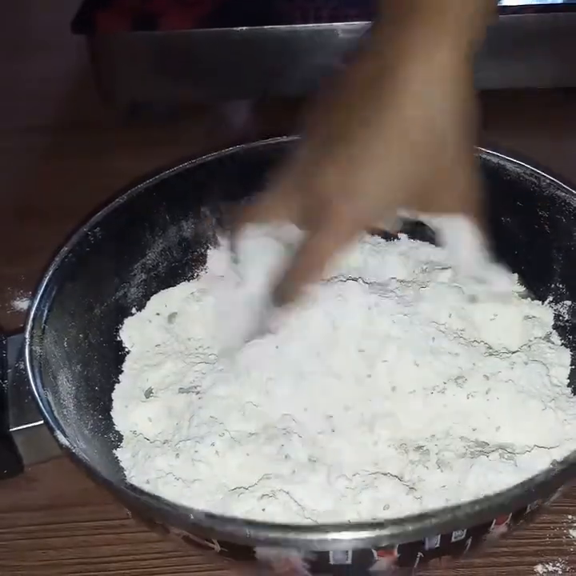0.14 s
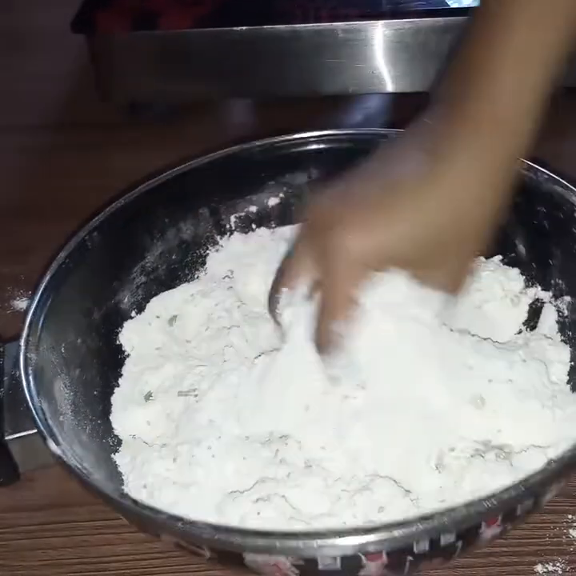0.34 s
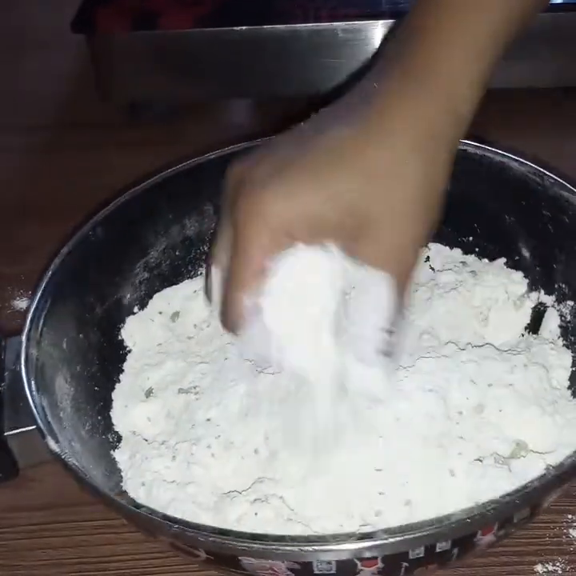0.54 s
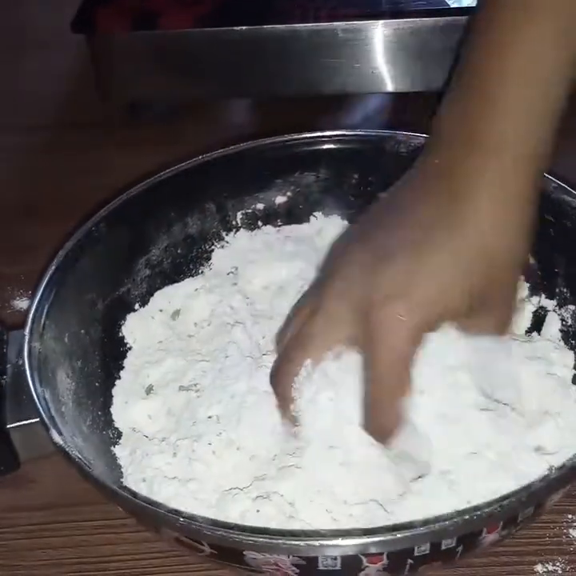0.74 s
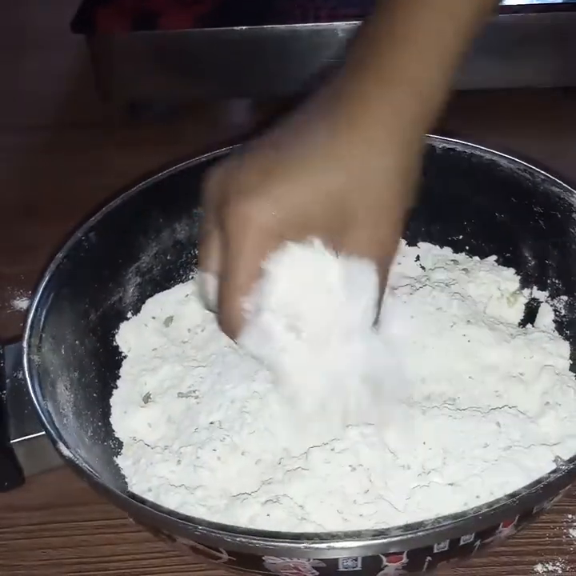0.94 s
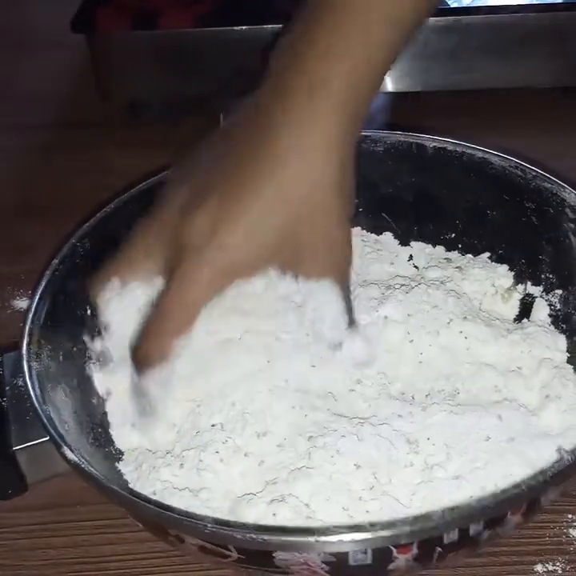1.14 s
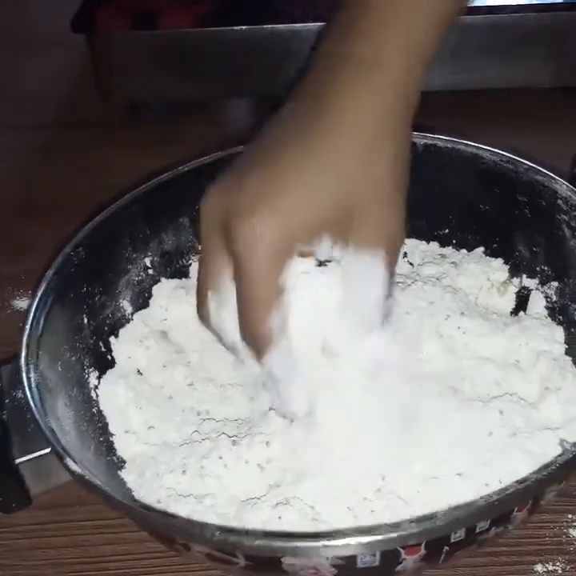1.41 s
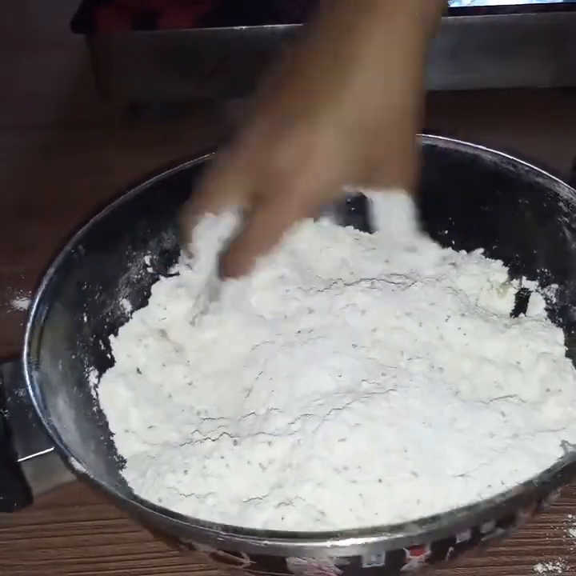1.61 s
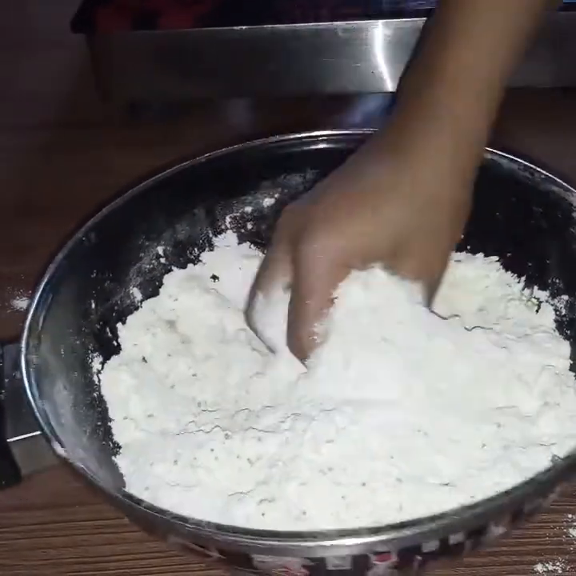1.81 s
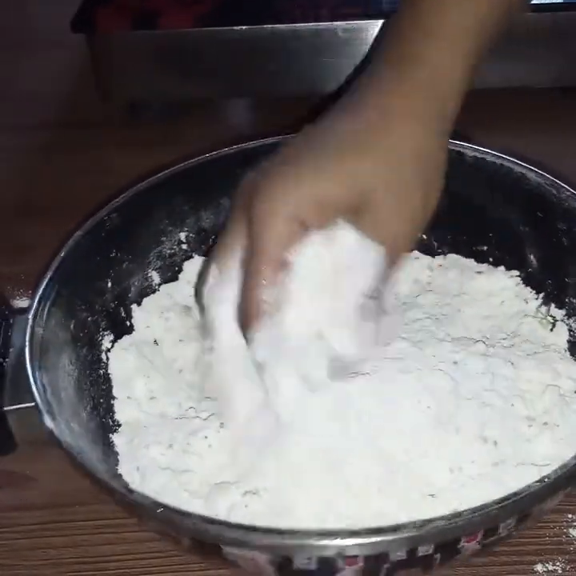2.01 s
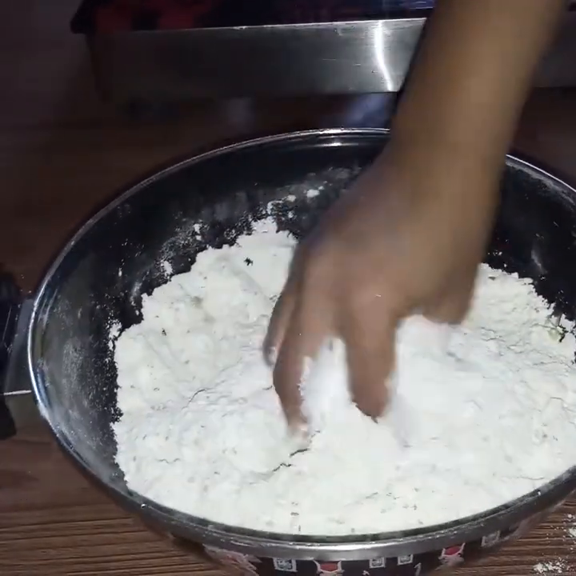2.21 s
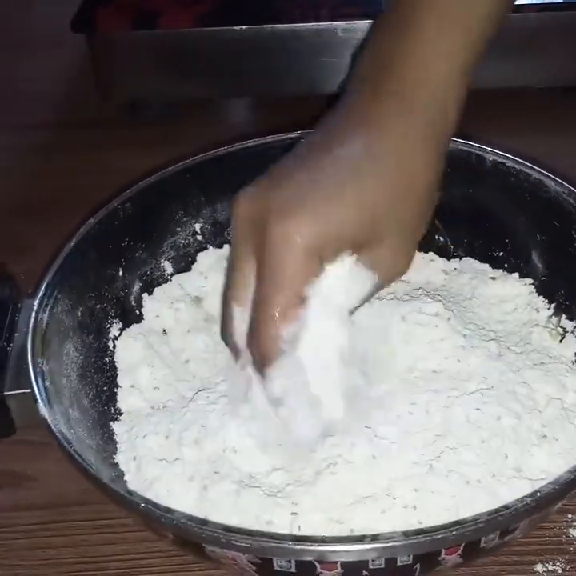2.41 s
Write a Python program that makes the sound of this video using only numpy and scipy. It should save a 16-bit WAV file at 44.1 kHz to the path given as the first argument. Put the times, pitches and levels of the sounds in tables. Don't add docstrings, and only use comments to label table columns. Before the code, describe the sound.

Fingers rub and squeeze damp flour in a metal bowl, with dull knocks on a wooden table

```python
import sys
import numpy as np
from scipy import signal
from scipy.fft import rfft, irfft, next_fast_len
from scipy.io import wavfile
from scipy.ndimage import uniform_filter1d

SR = 44100
rng = np.random.default_rng(int(sys.argv[2]) if len(sys.argv) > 2 else 0)


def natural_amplitude(level_db):
    exponent = np.asarray(level_db, float) / 20
    return 10 ** exponent


def generate_wav(sig):
    pcm = np.round(np.clip(np.atleast_2d(sig).T, -1, 1) * 32767).astype(np.int16)
    wavfile.write(sys.argv[1], SR, pcm)


N = 112454

# frequency in Hz, width in Hz, level in dB.
BOWL_RESONANCES = [(1697, 81, 19), (2298, 71, 18.5), (3450, 37, -19), (3920, 107, 1.5), (6050, 830, 4.5),
                   (8670, 130, 10)]
# frequency in Hz, level in dB, T60 in s.
TABLE_MODES = [(101.1, -10.5, 0.36), (145.3, -3, 0.16), (186, -1, 0.081), (240.1, -6.5, 0.16),
               (315.7, -12, 0.27), (362.4, -16, 0.16), (576, -14, 0.078), (682, -19, .12),
               (1093, -22.5, 0.038)]


def evened(x):
    return x / np.sqrt(np.mean(x ** 2) + 1e-20)


def add(mix, s, sound):
    part = mix[round(s * SR):][:len(sound)]
    part += sound[:len(part)]


def colour(x, points, patchy_db):
    hz, _, z = signal.stft(x, SR, nperseg=512, noverlap=384)
    f, level_db = np.transpose(points)
    patches = rng.standard_normal(z.shape[::-1]).T
    patches = uniform_filter1d(patches, size=6, axis=0)
    patches = evened(uniform_filter1d(patches, size=10, axis=1))
    tone_db = np.interp(np.log(hz + 1), np.log(f), level_db)[:, None]
    z = z * natural_amplitude(tone_db + patchy_db * patches)
    return evened(signal.istft(z, SR, nperseg=512, noverlap=384)[1][:N])


def resonate(x, hz, width):
    return signal.lfilter(*signal.iirpeak(hz, hz / width, SR), x)


def burst(centre_hz, wide, shape_db):
    n = len(shape_db)
    hz = np.fft.rfftfreq(n, 1 / SR) + 1
    band = np.exp(-.5 * (np.log2(hz / centre_hz) / wide) ** 2)
    noise = irfft(rfft(rng.standard_normal(n)) * band, n)
    return natural_amplitude(shape_db) * evened(noise)


def taps(rows, hold, t60, tail_db, tail_s, wide, rise):
    t, out = np.arange(round(.2 * SR)) / SR, np.zeros(N)
    head = natural_amplitude(-60 * np.maximum(t - hold, 0) / t60)
    tail = natural_amplitude(tail_db - 60 * t / tail_s)
    attack = np.minimum(t / rise + .01, 1)
    shape_db = 20 * np.log10((head + tail) * attack)
    for s, db, hz in rows:
        add(out, s, burst(hz, wide, db - 9.5 + shape_db))
    return out


def background_air():
    # frequency in Hz, level in dB.
    spectrum = [(30, 10), (90, 7.5), (200, -3.5), (500, -9), (1500, -13.5), (5000, -16), (9500, -24),
                (14000, -18)]
    return natural_amplitude(-61.5) * colour(rng.standard_normal(N), spectrum, 1.0)


def trickle():
    # time in s, level in dB.
    flow = [(0, -62.5), (.12, -71), (.2, -70), (.45, -62), (.65, -69), (.72, -64.5), (0.919, -67.5),
            (1.078, -75), (1.149, -67.5), (1.42, -63), (1.52, -65.5), (1.62, -59), (1.9, -62),
            (2.08, -63.5), (2.18, -63.5), (2.38, -65.5), (2.55, -73)]
    # frequency in Hz, level in dB.
    sift = [(500, -12), (780, -11), (1020, -3.5), (2000, -17), (3800, -3), (6300, -7), (8000, -10),
            (15800, -41)]
    s, db = np.transpose(flow)
    sizes = natural_amplitude(1.02 * rng.exponential(1, N)) * rng.standard_normal(N)
    crumbs = (rng.random(N) < 5000 / SR) * sizes
    crumbs = colour(crumbs, sift, 0.88)
    bowl = sum(natural_amplitude(h_db - 9) * resonate(crumbs, f, w) for f, w, h_db in BOWL_RESONANCES)
    return natural_amplitude(np.interp(np.arange(N) / SR, s, db)) * evened(crumbs + bowl)


def rocking():
    # time in s, level in dB, tilt in dB per octave.
    pressure = [(0, -83, -26), (.21, -66, -10), (.25, -52, -21), (.42, -39, -1), (.5, -44, -1),
                (0.599, -61, -24), (.73, -45, -22), (0.769, -41, -0.5), (.95, -57, -4), (1.188, -75, -34),
                (1.24, -55.5, -12), (1.515, -60, 1), (1.56, -46, -4), (1.72, -58, 5), (1.86, -43.5, 0),
                (2.17, -57.5, -1.5), (2.28, -46, -1), (2.38, -64, 3.5)]
    s, db, tilt_db = np.transpose(pressure)
    t, out = np.arange(N) / SR, np.zeros(N)
    level_db, tilt_db = np.interp(t, s, db), np.interp(t, s, tilt_db)
    lowest_hz = TABLE_MODES[0][0]
    for f, m_db, _ in TABLE_MODES:
        hum = resonate(rng.standard_normal(N), f, .14 * f)
        hum = evened(resonate(hum, f, .2 * f))
        envelope = abs(signal.hilbert(hum, next_fast_len(N))[:N])
        hum = evened(hum / (envelope + .1) ** .25)
        mode_db = m_db - 6 if f > lowest_hz else -9
        out += natural_amplitude(level_db + mode_db + tilt_db * np.log2(f / lowest_hz)) * hum
    return out


def nudges():
    # start in seconds, level in dB, pitch in Hz, hold in seconds.
    pushes = [(0.115, -67, 103.3, 0.045), (0.252, -50.5, 120, 0.031), (.29, -52.5, 114, .03),
              (.425, -52, 100, 0.027), (.585, -44.5, 97, 0.027), (0.767, -48.5, 84.5, .015),
              (.66, -55.5, 104.7, 0.08), (0.831, -49, 97, .02), (0.951, -54.5, 100, 0.021),
              (1.013, -67, 101, 0.021), (1.122, -59, 109.4, 0.033), (1.223, -48, 107.3, 0.037),
              (1.301, -47.5, 106, .045), (1.372, -48, 104.5, 0.011), (1.405, -44, 100.4, 0.023),
              (1.446, -54, 96, 0.049), (1.527, -43.5, 173, 0.007), (1.543, -41, 95.5, .03),
              (1.616, -47, 96.4, 0.032), (1.668, -49, 102, 0.031), (1.753, -44, 100, 0.031),
              (1.824, -49, 97.7, 0.035), (1.848, -36, 187, 0.016), (1.993, -39.5, 116, 0.0082),
              (2.053, -46.5, 94.7, 0.03), (2.119, -47.5, 112, 0.025), (2.198, -40.5, 183, 0.033),
              (2.248, -44, 110, 0.017), (2.282, -48, 109, 0.021), (2.392, -58.5, 98, 0.036),
              (2.479, -63, 100, .03)]
    rise_s, t60_s = .004, .11
    t, out = np.arange(round(.25 * SR)) / SR, np.zeros(N)
    for s, db, hz, hold in pushes:
        level_db = db + 2 - 60 * np.maximum(t - hold, 0) / t60_s
        swell = np.minimum(t / rise_s, 1)
        add(out, s, natural_amplitude(level_db) * swell * np.sin(2 * np.pi * hz * t))
    return out


def body_rings():
    # start in seconds, level in dB, centre in Hz.
    bowl_body = [
        (.151, -59, 600),
        (1.524, -48, 590),
        (1.545, -45, 610),
        (1.644, -52, 640),
        (1.709, -46, 607),
        (1.755, -41, 624),
    ]
    return taps(bowl_body, hold=0.007, t60=0.066, tail_db=-24, tail_s=0.25, wide=0.14, rise=0.0021)


def ticks():
    # start in seconds, level in dB, centre in Hz.
    nail_ticks = [
        (0.165, -42.5, 14000),
        (0.349, -35, 4770),
        (0.7668, -43, 3900),
        (1.54, -53.5, 3470),
        (1.5602, -32.5, 5140),
        (1.9801, -44.5, 4550),
        (2.0000, -33, 5560),
    ]
    # frequency in Hz, width in Hz, level in dB.
    wall_modes = [(3700, 580, -0.5), (5700, 410, 0.5), (2220, 210, 11)]
    contact = taps(nail_ticks, hold=0.0047, t60=0.0024, tail_db=2.5, tail_s=0.055, wide=0.85, rise=0.00047)
    ring = sum(natural_amplitude(db) * resonate(contact, f, w) for f, w, db in wall_modes)
    return 0.81 * contact + ring


def skims():
    # peak in seconds, level in dB, rise in seconds, fall in seconds.
    passes = [
        (.181, -54, .003, 0.25),
        (1.17, -58, .012, 0.18),
        (1.66, -47, 0.021, 0.17),
    ]
    # frequency in Hz, level in dB.
    airy = [(4000, -14), (8000, -30), (10500, -8), (13300, 0), (15800, -6)]
    t, power = np.arange(N) / SR, np.zeros(N)
    for s, db, rise, fall in passes:
        distance = np.where(t < s, (s - t) / rise, (t - s) / fall)
        power += natural_amplitude(db - 14 * distance) ** 2
    return np.sqrt(power) * colour(rng.standard_normal(N), airy, 2.5)


def rubbing():
    # peak in seconds, level in dB, rise in seconds, fall in seconds, dull part in relative dB.
    strokes = [(0.207, -55, 0.011, 0.13, -30), (0.264, -40, 0.084, 0.16, -11),
               (0.328, -44.5, 0.17, 0.15, -1.5), (0.751, -57, 0.04, 0.29, 6.5),
               (.795, -47, 0.067, 0.16, -3.5), (0.836, -48.5, 0.029, 0.045, -8),
               (1.179, -55, 0.035, 0.42, -22), (1.269, -39.5, 0.11, 0.15, -4),
               (1.579, -55, 0.043, 0.075, -0.5), (1.654, -54, 0.033, 0.075, -28),
               (1.691, -58, 0.041, 0.18, -12), (1.784, -38.5, 0.15, 0.15, -5),
               (2.019, -70, 0.048, 0.11, 12), (2.213, -55.5, 0.057, 0.16, 8.5),
               (2.265, -42.5, 0.077, 0.1, -10.5)]
    # frequency in Hz, level in dB.
    fizz = [(1200, -14.5), (3000, -16.5), (5500, -3), (8300, 1.5), (10500, 2), (13000, -1), (15800, -6)]
    # frequency in Hz, level in dB.
    rustle = [(450, -21), (1200, -2), (2000, -5), (2500, 0.5), (3700, 7.5), (6000, -0.5), (9000, -4.5),
              (15800, -9)]
    # frequency in Hz, level in dB.
    scuff = [(500, -44), (950, -2), (1400, 5.5), (2200, 2.5), (3500, 5), (7000, -70)]
    grains_per_s, drop_db, skirt = 14000, -51.5, 0.33
    t, out = np.arange(N) / SR, np.zeros(N)
    # spectrum, lag in s, stretch of the fall, share of the dull level, level in dB
    parts = ((fizz, 0, 1, 0, 0), (rustle, 0.015, 0.77, 1, 0), (scuff, 0.038, 0.77, 1, -9.5))
    for tone, lag, slow, dull, part_db in parts:
        sizes = natural_amplitude(1.6 * rng.exponential(1, N)) * rng.standard_normal(N)
        slips = (rng.random(N) < grains_per_s / SR) * sizes
        grains = colour(slips, tone, 2.5)
        bowl = sum(natural_amplitude(db - 5.0) * resonate(grains, f, w) for f, w, db in BOWL_RESONANCES)
        grains = evened(grains + natural_amplitude(-10.5) * bowl)
        power = np.zeros(N)
        for s, db, rise, fall, dull_db in strokes:
            peak = s + lag
            u = np.where(t < peak, (peak - t) / rise, (t - peak) / (fall * slow))
            shape = np.sqrt(0.28 + u ** 2) - np.sqrt(.3) + skirt * u ** 2
            power += natural_amplitude(db + part_db + dull * dull_db + drop_db * shape) ** 2
        out += grains * np.sqrt(power)
    return out


def knocks():
    # start in seconds, level in dB, centre in Hz.
    knuckles = [(.244, -31.5, 1550), (.344, -23, 1330), (.566, -45, 1240), (.597, -43.5, 2220),
                (.744, -42.5, 1630), (.768, -40, 1310), (1.144, -52, 1000), (1.225, -40.5, 1300),
                (1.278, -44, 2500), (1.316, -31, 1600), (1.524, -45, 910), (1.6445, -40.5, 1100),
                (1.692, -42.5, 1780), (1.707, -39, 2000), (1.757, -36.5, 1680), (1.829, -28, 1290),
                (1.845, -34.5, 1600), (1.9562, -35, 800), (1.96, -34, 1170), (1.98, -29.5, 1490),
                (2.001, -35.5, 1770), (2.072, -41.5, 1600), (2.153, -49.5, 1550), (2.272, -32.5, 2280),
                (2.483, -47.5, 1610)]
    return taps(knuckles, hold=0.0017, t60=0.0086, tail_db=-14, tail_s=0.41, wide=0.69, rise=0.00056)


def thumps():
    # start in seconds, level in dB, loudest frequency in Hz, hardness in dB.
    strikes = [(.344, -21.5, 172, 4), (0.365, -27.5, 164, -1), (.39, -32.5, 140, 3), (.425, -41, 136, 4),
               (0.491, -47, 143, 3.5), (0.531, -40.5, 149, 5), (0.592, -38.5, 110, 1.5),
               (.744, -33, 171, 1), (.767, -33.5, 183, -20), (.79, -43.5, 154, 3), (1.524, -40, 210, 4),
               (1.545, -39, 170, 4.5), (1.562, -45, 128, 8), (1.758, -46.5, 166, 10.5),
               (1.828, -25.5, 186, 3), (1.845, -30, 180, -5), (1.956, -31.5, 157, 3),
               (1.977, -36, 153, 8.5), (1.994, -36.5, 132, -6), (2.069, -43, 169, 2),
               (2.198, -35.5, 241, -1), (2.228, -39, 183, -1)]
    hold_s, rise_s, choke_db, choke_s = 0.0065, 0.0051, -14, 0.0023
    focus_db, focus_floor_db = -48, -9.5
    dust_hz, dust_db, dust_t60_s = 497, -27.5, 0.43
    t, out = np.arange(round(.5 * SR)) / SR, np.zeros(N)
    detune = rng.uniform(.98, 1.02, (len(strikes), len(TABLE_MODES)))
    after = np.maximum(t - hold_s, 0)
    next_starts = [row[0] for row in strikes[1:]] + [N / SR]
    for (s, db, top_hz, hard_db), off, next_s in zip(strikes, detune, next_starts):
        ring = np.zeros(len(t))
        for (f, m_db, t60), k in zip(TABLE_MODES, off):
            away_db = max(focus_db * np.log2(f / top_hz) ** 2, focus_floor_db + hard_db)
            ring += natural_amplitude(m_db + away_db - 60 * after / t60) * np.sin(2 * np.pi * f * k * t)
        choke = natural_amplitude(choke_db * np.clip((t - next_s + s) / choke_s, 0, 1))
        dust = burst(dust_hz, 0.9, dust_db + hard_db - 60 * t / dust_t60_s)
        add(out, s, natural_amplitude(db) * np.minimum(t / rise_s, 1) * (choke * ring + dust))
    return out


def crunches():
    # start in seconds, level in dB, centre in Hz.
    clumps = [(.795, -43, 3950), (.822, -39, 2740), (.83, -43.5, 1930), (.84, -44, 3670),
              (1.262, -31.5, 3680), (1.27, -37, 2400), (1.3, -38, 3200), (1.78, -37.5, 3700),
              (1.81, -34, 3850), (1.83, -34, 4000), (2.211, -40, 3370), (2.233, -49, 3460),
              (2.255, -36, 3430), (2.278, -39.5, 1474), (2.49, -60, 1200), (2.515, -56, 1150)]
    return taps(clumps, hold=0.011, t60=0.027, tail_db=-37, tail_s=0.081, wide=.12, rise=0.0011)


def kitchen(x):
    dull_hz, t60_s = 4550, 0.44
    t = np.arange(SR // 2) / SR
    tail = signal.lfilter(*signal.butter(1, dull_hz, fs=SR), rng.standard_normal(len(t)))
    tail = tail * natural_amplitude(-60 * t / t60_s) * (t > .006)
    return natural_amplitude(-13.5) * signal.fftconvolve(x, tail / np.linalg.norm(tail))[:N]


def scene():
    near = trickle() + body_rings() + ticks() + skims() + rubbing() + knocks() + thumps() + crunches()
    return (near + kitchen(near) + rocking() + nudges() + background_air())[None]


def low_pass(x):
    return signal.sosfilt(signal.butter(12, 16470, fs=SR, output="sos"), x)


def record(dry):
    low_hz, notch_hz, notch_width_hz, edge_hz = 70.3, 9480, 2250, 15780
    x = signal.sosfilt(signal.butter(2, low_hz, "high", fs=SR, output="sos"), dry)
    x = x - 0.46 * resonate(x, notch_hz, notch_width_hz)
    band_limit = signal.firwin(511, edge_hz, window=("kaiser", 9), fs=SR)
    x = signal.oaconvolve(x, band_limit[None], "same")
    return low_pass(x)


dry = scene()
out = record(dry)
generate_wav(out)
```